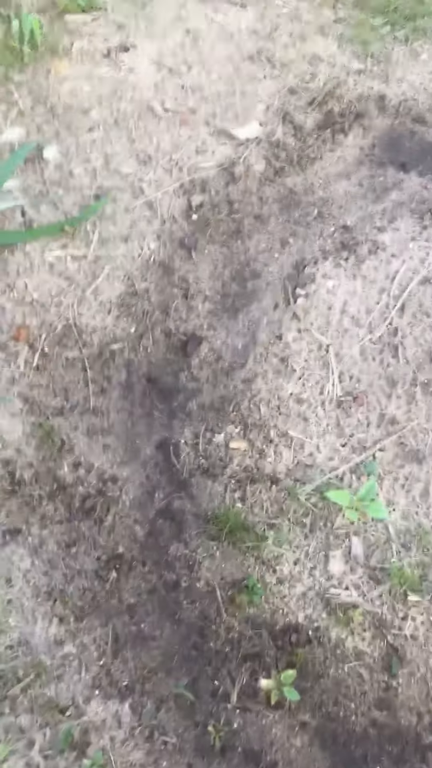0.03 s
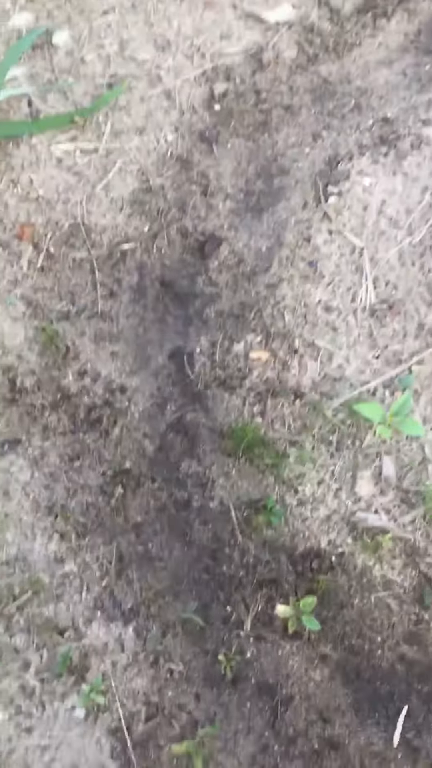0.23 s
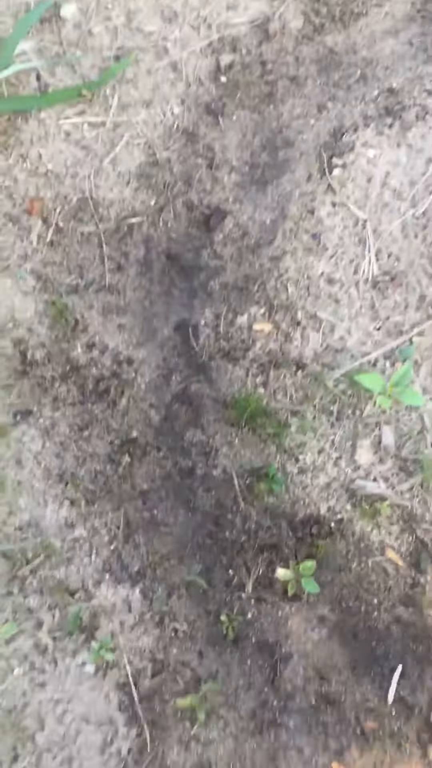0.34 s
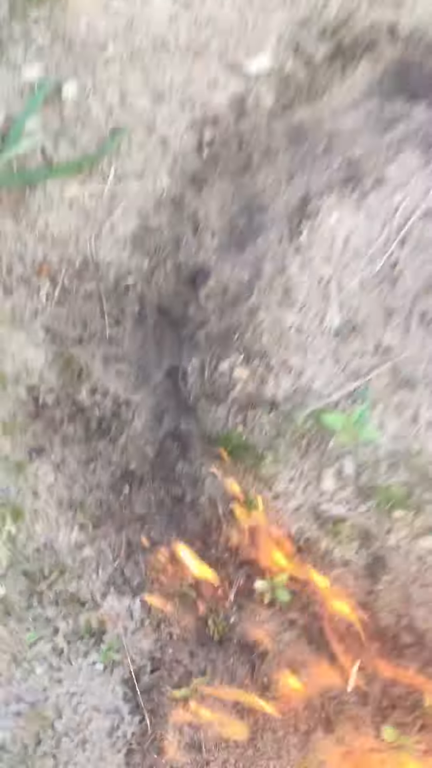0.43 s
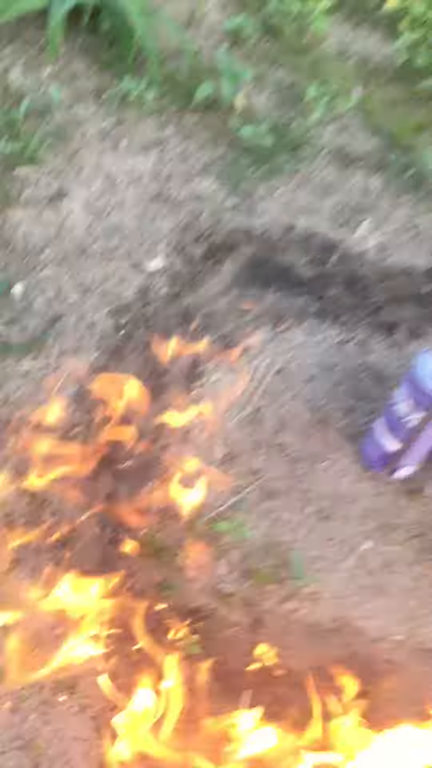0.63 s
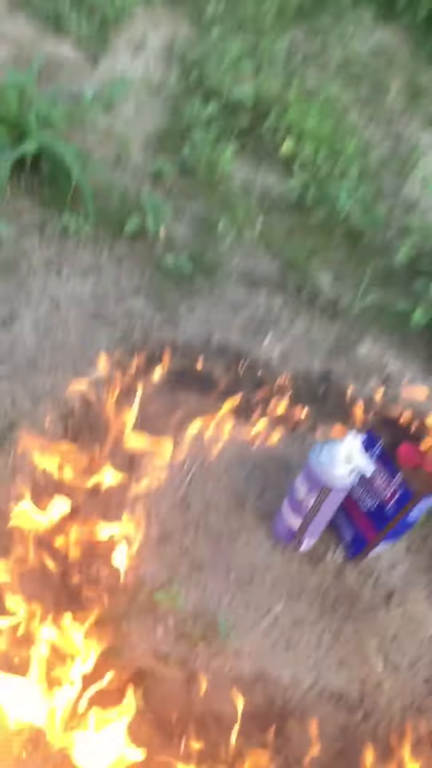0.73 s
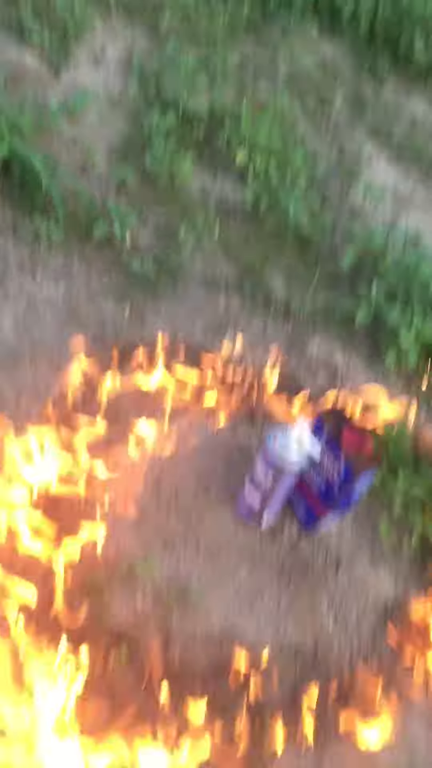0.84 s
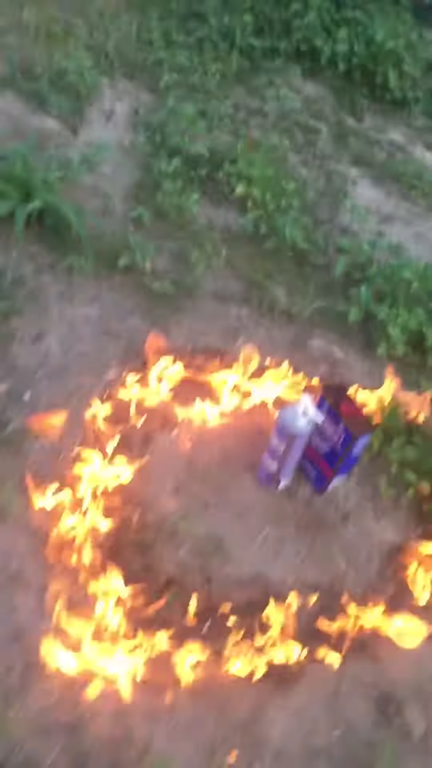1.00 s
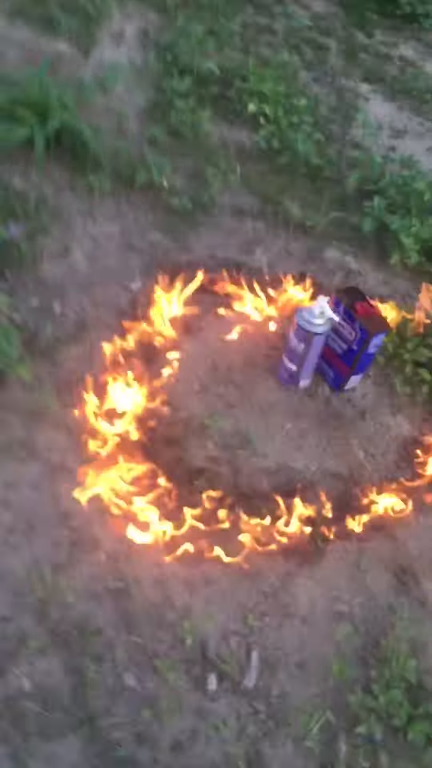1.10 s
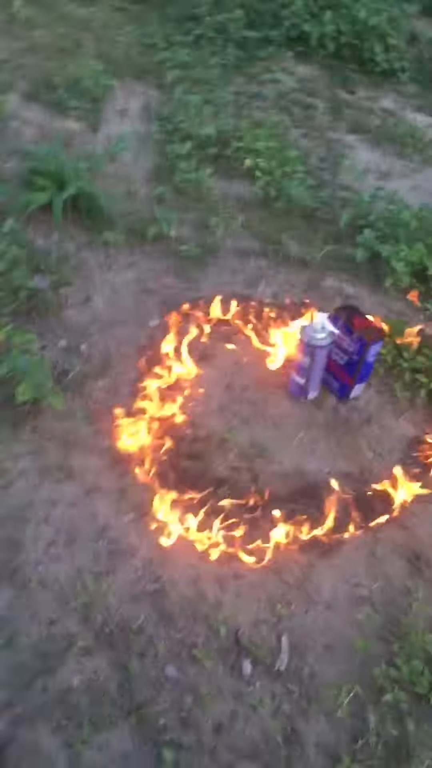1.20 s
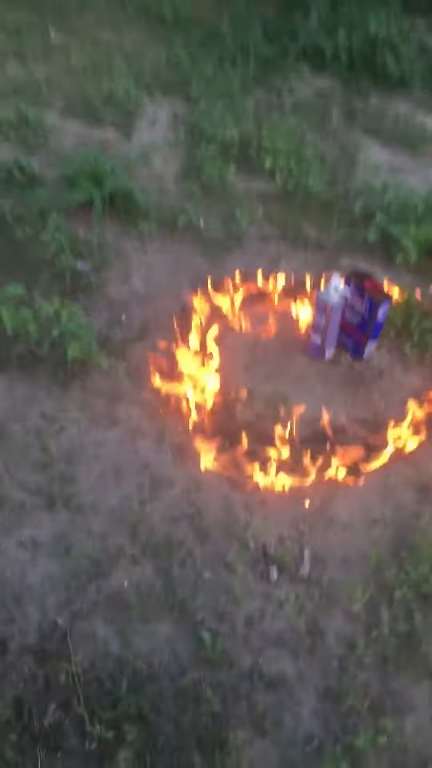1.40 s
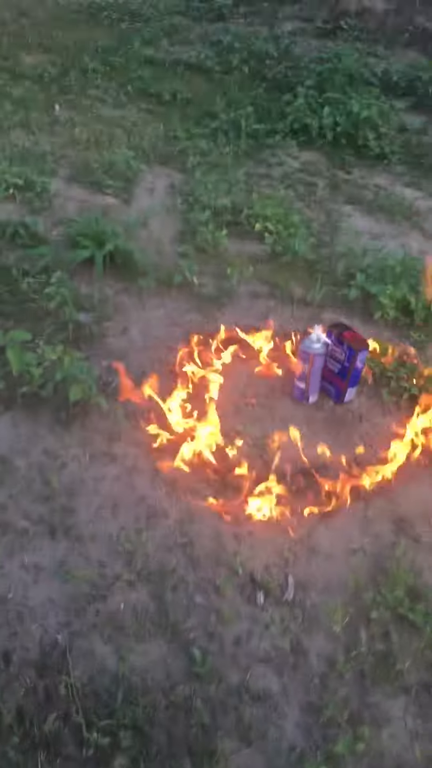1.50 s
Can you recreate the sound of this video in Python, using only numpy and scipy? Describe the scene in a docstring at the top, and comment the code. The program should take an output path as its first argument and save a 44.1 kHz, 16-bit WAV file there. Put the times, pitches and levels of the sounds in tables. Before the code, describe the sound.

Flames whoosh up outdoors, set off by a lighter's click, and flutter briefly with a few crackles. As they die down, gritty steps and a twig snap follow, with low handling thumps on the close, handheld microphone.

```python
"""Ring of fuel catching on dry soil

Outdoors, one handheld microphone. A lighter clicks, the vapour catches and the flame front runs
round the ring with a low, fluttering whoosh and a few crackles. The person holding the microphone
steps back, crunching and scuffing over the dirt, with soft handling bumps and a low rumble.
Behind it all lie quiet air and the faint, high trill of a far insect's wings."""
import sys
import numpy as np
from scipy import signal
from scipy.fft import rfft, irfft
from scipy.io import wavfile
from scipy.ndimage import uniform_filter1d

SR = 44100
rng = np.random.default_rng(int(sys.argv[2]) if len(sys.argv) > 2 else 0)


def unload_audio(sound):
    """Save the sound as a 16-bit wav file, at the path given as the first command line argument."""
    columns = np.transpose(np.atleast_2d(sound))
    # keep every value between -1 and 1, then stretch to whole-number steps
    steps = np.round(np.clip(columns, -1, 1) * 32767)
    wavfile.write(sys.argv[1], SR, steps.astype(np.int16))


N = 68355
T = np.arange(N) / SR
BIN_HZ = np.arange(N + 1) * SR / (2 * N)


def from_db(db):
    """Decibels to gain."""
    return 10 ** (np.asarray(db) / 20)


def unit_rms(x):
    """Scale to an rms of 1."""
    return x / np.sqrt(np.mean(x ** 2) + 1e-20)


def steady(x, samples):
    """Hold the running rms near 1."""
    return x / np.sqrt(uniform_filter1d(x ** 2, size=samples))


def white():
    """White noise."""
    return rng.standard_normal(N)


def drift(rate_hz):
    """Random wander, mostly slower than rate_hz; rms 1."""
    spectrum = rfft(rng.standard_normal(2 * N)) / (1 + (BIN_HZ / rate_hz) ** 2)
    return unit_rms(irfft(spectrum)[:N])


def colour(x, spectrum):
    """Give a signal a smooth spectrum that falls away below its lowest point; rms 1."""
    hz, db = np.transpose(spectrum)
    f = np.maximum(BIN_HZ, 1)
    gain = from_db(np.interp(np.log(f), np.log(hz), db)) * np.minimum(f / hz[0], 1) ** 2
    return unit_rms(irfft(rfft(x, 2 * N) * gain)[:N])


def resonate(x, hz, width_hz):
    """One resonance with gain 1 at its peak."""
    r = np.exp(-np.pi * width_hz / SR)
    feedback = [1, -2 * r * np.cos(2 * np.pi * hz / SR), r * r]
    return signal.lfilter(np.array([1, 0, -1]) * (1 - r * r) / 2, feedback, x + 1e-18)


def decay(start, fall_s):
    """Sudden onset, exponential fall."""
    return (T >= start) * np.exp(-np.clip((T - start) / fall_s, 0, 60))


def ring(start, modes):
    """A struck body: damped sines of alternating sign."""
    out = np.zeros(N)
    for k, (hz, db, t60) in enumerate(modes):
        envelope = from_db(db) * decay(start, t60 / np.log(1000))
        out += (-1) ** k * envelope * np.sin(2 * np.pi * hz * (T - start))
    return out


def grains(per_s, spread_db):
    """Random clicks of uneven size."""
    sizes = from_db(spread_db * np.minimum(rng.exponential(1, N), 4))
    return (rng.random(N) < per_s / SR) * sizes * rng.choice([-1, 1], N)


# Open air around the microphone: frequency_hz, density_db
AIR_SPECTRUM = [(200,-20),(450,-15),(1000,-8.5),(2500,-14),(3400,-10),(5000,-16),(9000,-17.5),(16000,-26)]
def air():
    """Still air, heard as a faint, even hiss."""
    return from_db(-69) * colour(white(), AIR_SPECTRUM)


def insect():
    """A far insect: chirps of uneven wing strokes, each stroke falling in pitch."""
    strokes_per_s, chirps_per_s, fall_hz, pitches_hz = 125, 29, 700, (8150, 9800)
    stroke_phase = (np.cumsum(strokes_per_s * (1 + 0.2 * drift(30))) / SR) % 1
    fall = fall_hz * (stroke_phase - 0.5)
    low, high = [np.sin(2 * np.pi * np.cumsum(hz - fall) / SR + 0.9 * drift(400)) for hz in pitches_hz]
    swell_db = 70 * np.maximum(T - 1.4, 0)  # louder at the very end
    chirp_db = 5 * np.sin(2 * np.pi * chirps_per_s * T + drift(10))
    uneven_db = 3 * np.clip(drift(45), -2, 1)
    level = from_db(-73.5 + swell_db + chirp_db + uneven_db) * np.sin(np.pi * stroke_phase)
    return level * (low + from_db(-7) * high)


# Rumble of the hand, right on the microphone: frequency_hz, density_db
HAND_SPECTRUM = [(25,-26),(55,4),(85,-12.5),(125,6),(180,-8.5),(300,-20),(600,-29.5),(1500,-47.5)]
# Its course as the hand moves: time_s, level_db
HAND_LEVEL = [(0,-51),(.1,-55),(.22,-53.5),(1.0,-52),(1.07,-38.5),(1.2,-47.5),(1.29,-50.5),(1.42,-53),(1.55,-46)]
# Footfalls and knocks reaching the microphone: start_s, level_db, pitch_hz, rise_s
HAND_BUMPS = [(.012,-52.5,59.8,0.0105),(0.124,-49,65.4,0.0095),(0.236,-36.5,147.4,0.0017),(.918,-48,198,0.0064),(1.045,-28,283,0.0018),(1.074,-37,343,0.0035),(1.086,-48,139.8,0.014),(1.122,-27,64,0.012),(1.18,-37,76.5,0.01),(1.249,-25.5,98,0.0032),(1.431,-47,266,0.0044),(1.487,-39,77,0.014),(1.531,-39,141.4,0.00217)]
def handling():
    """Damped low bumps over the rumble of the moving hand."""
    rumble = steady(colour(white(), HAND_SPECTRUM), samples=3000)
    out = rumble * from_db(np.interp(T, *np.transpose(HAND_LEVEL)))
    for start, db, hz, rise in HAND_BUMPS:
        age = np.maximum(T - start, 0)
        envelope = (age / rise * np.exp(1 - age / rise)) ** 1.27
        out += from_db(db) * envelope * np.sin(2 * np.pi * hz * age)
    return out


# Dry soil and its grit, underfoot: frequency_hz, density_db
SOIL_SPECTRUM = [(220,-0.5),(450,-5),(900,-3.5),(1500,-1.5),(2300,1),(3200,-4.5),(4200,-5),(6000,-17.5),(10000,-23),(16000,-43.5)]
GRIT_SPECTRUM = [(1500,-6),(4000,-1.5),(8000,1),(12000,-6),(16000,-13)]
# A shoe below the microphone: start_s, attack_s, hold_s, release_s, level_db, grit_offset_db
SHOE_SCUFFS = [(0.89,0.011,0.01,0.016,-52,-2),(0.939,0.0092,0.011,0.087,-56.5,2),(1.032,0.006,0.0054,0.019,-56,4),(1.044,0.002,0.023,0.037,-44.5,1),(1.076,0.0084,0.0098,0.075,-47.5,-7),(1.125,0.012,0.0059,0.042,-56,4),(1.251,0.035,0.0134,0.044,-54.5,5.5),(1.287,0.036,0.012,0.055,-50,-23),(1.334,0.0077,0.015,0.092,-55.5,-8),(1.379,0.0117,0.0183,0.051,-58,3)]
def scuffs():
    """The sole grinds soil in shifting patches of pitch and crushes bright grit."""
    edges_hz = np.geomspace(200, 16000, num=14)
    crumbs = grains(per_s=6000, spread_db=2)
    patches = np.zeros(N)
    for band in zip(edges_hz, edges_hz[1:]):
        bandpass = signal.butter(1, band, "band", fs=SR, output="sos")
        patches += signal.sosfilt(bandpass, crumbs) * from_db(3.5 * drift(38))
    soil = colour(patches, SOIL_SPECTRUM)
    grit = colour(grains(per_s=2400, spread_db=0.5), GRIT_SPECTRUM)
    out = np.zeros(N)
    for start, attack, hold, release, db, grit_db in SHOE_SCUFFS:
        press = np.clip((T - start) / attack, 0, 1)
        lift_db = -20 * np.maximum(T - start - attack - hold, 0) / release
        out += from_db(db + lift_db) * press * (soil + from_db(grit_db - 8) * grit)
    chatter_db = 2 * drift(200)
    return out * from_db(chatter_db)


# Stones under the same shoe: start_s, length_s, level_db, from_hz, to_hz
STONE_SCRAPES = [(1.051,.018,-46,3700,4200),(1.085,0.0282,-46.5,2350,1807),(1.135,.017,-50.5,2900,3310),(1.153,0.0087,-45.5,1680,1550),(1.388,.016,-54.5,1300,1540)]
def scrapes():
    """Stones dragged under the sole ring in a narrow, sliding band."""
    out = np.zeros(N)
    for start, length, db, from_hz, to_hz in STONE_SCRAPES:
        phase = 2 * np.pi * np.cumsum(np.interp(T, [start, start + length], [from_hz, to_hz])) / SR
        press = np.sqrt(np.abs(np.sin(np.pi * np.clip((T - start) / length, 0, 1))))
        chatter_db, jitter_rad = 2 * drift(225), 1.34 * drift(258)
        out += from_db(db + chatter_db) * press * np.sqrt(2) * np.sin(phase + jitter_rad)
    return out


# A twig on the ground, late in the step back: start_s, level_db
TWIG_CRACKS = [(1.4111,-29.5),(1.415,-38)]
# Its dry wood: pitch_hz, relative_db, t60_s
WOOD_MODES = [(3780,-11.5,0.0094),(5920,-1.5,0.0048),(6500,-3,0.0076),(7700,-6.5,.005),(8560,-5,0.0059),(12600,-8,.002)]
def twig():
    """A dry twig breaks in two quick steps, each ringing its modes."""
    return sum(from_db(db) * ring(start, WOOD_MODES) for start, db in TWIG_CRACKS)


# Dry stalks and grit on the ground around: start_s, peak_db, centre_hz
STALK_SNAPS = [(0.295,-31.5,830),(0.295,-41,5000),(0.338,-34.5,890),(0.363,-45,3500),(0.4205,-33.5,1070),(0.449,-37.5,1200),(.502,-31,880),(0.5145,-28.5,10100),(.533,-30.5,2000),(0.579,-33,8000),(0.5875,-29,1080),(0.606,-27.5,3300),(0.6265,-20.5,1860),(.627,-30,9150),(0.640,-37,8000),(0.676,-35,10000),(.697,-30.5,6950),(0.7262,-22,11000),(0.732,-28.5,2200),(.774,-21.5,7000),(0.798,-27.5,700),(.964,-29.5,2230),(1.0472,-30.5,2500),(1.050,-29.5,6450),(1.067,-31.5,870),(1.078,-31,800),(1.0874,-27.5,1900),(1.442,-40.5,2010)]
def snaps():
    """Stalks and grit snap in sharp, broad cracks with a faint tail off the ground."""
    out = np.zeros(N)
    for start, db, hz in STALK_SNAPS:
        burst = white() * (decay(start, fall_s=0.00046) + from_db(-14) * decay(start, fall_s=0.0046))
        burst[int(start * SR)] = from_db(16.5)  # the sharp leading edge
        lowpass = signal.butter(1, min(hz * 3.7, 20000), fs=SR)
        crack = signal.lfilter(*lowpass, resonate(burst, hz, width_hz=0.88 * hz))
        out += from_db(db) * crack / np.abs(crack).max()
    return out


# Dry litter in the flame's path; also colours the lighter's tail: frequency_hz, density_db
CRACKLE_SPECTRUM = [(500,1),(1200,-8),(3500,2),(6000,-8),(10000,-8.5),(16000,-13)]
def crackle():
    """Dry litter crackles, swelling and fading as the front passes."""
    passing_db = -75 * np.maximum(0.74 - T, 0) - 84 * np.maximum(T - 0.79, 0)
    return colour(grains(per_s=650, spread_db=0.5), CRACKLE_SPECTRUM) * from_db(-52.5 + passing_db)


# The lighter's body, near the microphone: pitch_hz, level_db, t60_s
CLICK_MODES = [(1680,-41,0.0066),(2260,-47.5,0.0049),(3255,-12,0.0082),(4633,-37,0.006),(6327,-22.5,0.006),(6739,-13.5,0.0064),(7800,-20.5,0.00925),(9480,-21.5,0.0091),(11770,-26,0.0116),(12950,-37,0.0098)]
# Its mechanism rubbing around the strike: peak_s, level_db, swell_s, fall_s
MECHANISM_RASPS = [(0.2341,-42.5,0.004,.003),(0.238,-23,0.000577,0.00146),(0.2413,-34,0.00055,0.00317)]
# The colour of that rub: frequency_hz, density_db
RASP_SPECTRUM = [(550,-2),(1050,-6),(1500,1),(3200,-3),(5300,-1.5),(7000,-8.5),(9400,-2),(10600,-8.5),(12800,0.5),(16000,-15.5)]
def lighter():
    """The mechanism rasps, then one strike rings a body too small to radiate much bass."""
    strike_s = 0.2393
    rub = sum(from_db(db) * np.exp(-np.maximum((peak_s - T) / swell, (T - peak_s) / fall))
              for peak_s, db, swell, fall in MECHANISM_RASPS)
    tail = from_db(-44) * decay(strike_s, fall_s=0.012) * colour(white(), CRACKLE_SPECTRUM)
    click = ring(strike_s, CLICK_MODES) + rub * colour(white(), RASP_SPECTRUM) + tail
    return signal.sosfilt(signal.butter(2, 900, "high", fs=SR, output="sos"), click)


# Fine turbulence over the ring; also colours the flares' spit: frequency_hz, density_db
RUSH_SPECTRUM = [(200,3.5),(450,0),(900,-2),(1800,-8),(3500,-15),(6000,-27),(10000,-33.5),(16000,-56)]
# Its course at the microphone: time_s, level_db
RUSH_COURSE = [(.25,-63),(.32,-56),(.39,-60),(.45,-48),(.51,-49.5),(.57,-43),(.60,-38.5),(.645,-42),(.70,-43),(.75,-49.5),(.805,-45),(.86,-48.5),(.905,-60),(.94,-84.5),(1.02,-69)]
def rush():
    """Fine turbulence in the flame makes a quickly fluttering rush."""
    noise = colour(white(), RUSH_SPECTRUM)
    flutter_db = 3.5 * drift(95)
    return noise * from_db(np.interp(T, *np.transpose(RUSH_COURSE)) + flutter_db)


# Pockets of vapour along the ring: centre_s, peak_db, half_width_ms
VAPOUR_FLARES = [(.343,-21,1.56),(.387,-25.5,2.7),(0.421,-25.5,1.92),(0.495,-25,1.64),(0.501,-24,1.266),(.577,-29,1.4),(0.599,-18,1.32),(.608,-25.5,1.2),(0.627,-20,0.93),(.637,-16,1.25),(0.661,-23,1.5),(0.699,-24,1.7),(0.799,-32.5,0.8),(0.889,-28,1.9)]
def flares():
    """Each pocket flares up with one swing of pressure and a brief spit."""
    out = np.zeros(N)
    spit = from_db(-19) * colour(white(), RUSH_SPECTRUM)
    for centre_s, db, half_width_ms in VAPOUR_FLARES:
        offset = (T - centre_s) * 1000 / half_width_ms
        swing = -offset * np.exp((1 - offset ** 2) / 2)
        out += from_db(db) * (swing + spit * decay(centre_s, fall_s=0.0022))
    return out


# The flame front running round on the soil: time_s, vigour_db
BURN_COURSE = [(0.23, -43), (0.346, -34.5), (0.38, -34.5), (0.642, -25.5), (0.71, -29), (0.724, -32.5),
               (0.774, -27), (0.862, -31), (0.89, -27.5), (0.924, -44), (1.0, -56.5)]
# Its roar before it moves away from the microphone: frequency_hz, density_db
ROAR_SPECTRUM = [(35,-19),(50,-0.5),(70,2),(120,-1.5),(180,-1.5),(260,-7.5),(380,-16.5),(700,-25),(1500,-44),(4000,-55)]
def roar():
    """The burn drives a low roar, which loses its bass as the front moves away."""
    full_burn_db, recede_s, bass_hz, bass_loss_db_per_s = -26.5, 0.52, 109.4, 48
    burn_db = np.interp(T, *np.transpose(BURN_COURSE)) - full_burn_db
    noise = steady(colour(white(), ROAR_SPECTRUM), samples=1500)
    bass = signal.sosfiltfilt(signal.butter(2, bass_hz, fs=SR, output="sos"), noise)
    bass_lost = 1 - from_db(-bass_loss_db_per_s * np.maximum(T - recede_s, 0))
    flutter_db = drift(44)
    return (noise - bass * bass_lost) * from_db(-27 + 0.97 * burn_db + flutter_db)


def flame():
    """The vapour catches: roar, rush and crackle set in, then die away after the burn."""
    lit_s, spent_s = 0.229, BURN_COURSE[-1][0]
    alight = np.clip((T - lit_s) / 0.021, 0, 1) * np.exp(-np.maximum(T - spent_s, 0) / 0.3)
    return alight * (roar() + rush() + crackle())


def scene():
    """Fire, footwork and background meet at one handheld microphone."""
    fire = lighter() + flame() + flares()
    ground = snaps() + scuffs() + scrapes() + twig()
    return (fire + ground + handling() + insect() + air())[None]


def record(dry):
    """The microphone chain cuts the deepest bass and the very top."""
    low_cut_hz, high_cut_hz = 34, 16100
    dry = signal.sosfilt(signal.butter(5, low_cut_hz, "high", fs=SR, output="sos"), dry)
    return signal.sosfilt(signal.ellip(10, 0.2, 80, high_cut_hz, fs=SR, output="sos"), dry)


dry = scene()
out = record(dry)
unload_audio(out)
```